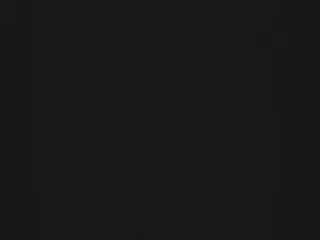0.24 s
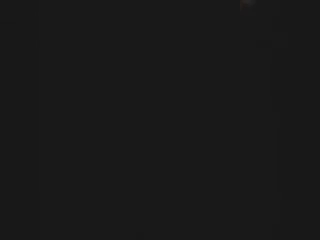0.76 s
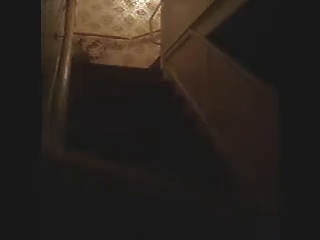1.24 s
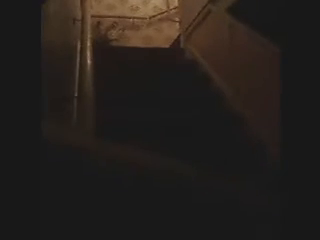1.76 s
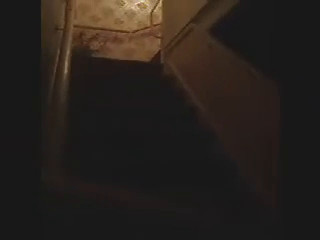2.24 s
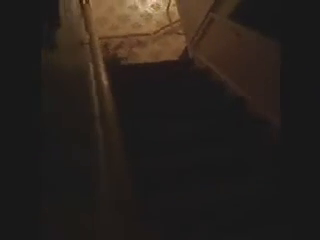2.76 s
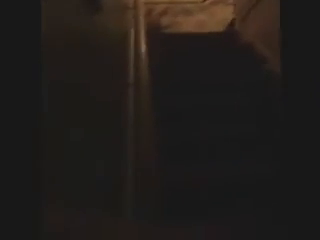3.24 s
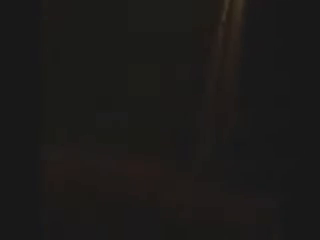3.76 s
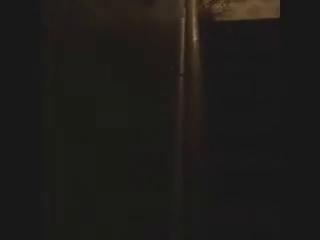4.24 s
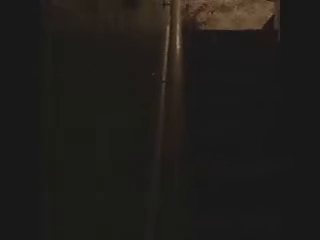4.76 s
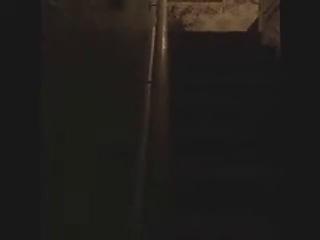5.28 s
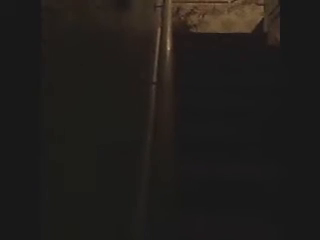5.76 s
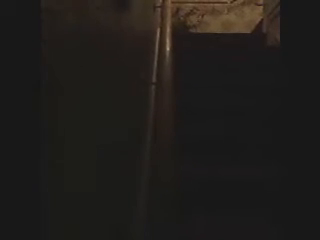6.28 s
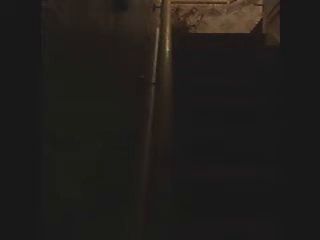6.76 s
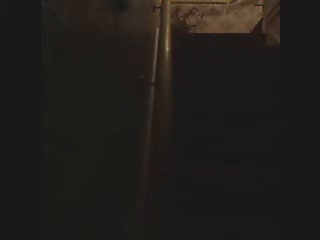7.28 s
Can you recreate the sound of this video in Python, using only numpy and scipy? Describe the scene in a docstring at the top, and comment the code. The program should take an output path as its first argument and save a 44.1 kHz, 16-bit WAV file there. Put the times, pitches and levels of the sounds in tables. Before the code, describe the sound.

A phone is shifted about in the hand on a dark indoor staircase. It opens with a tick and a loud bump, then skin and sleeve slide over the case right beside the microphone in short, hollow rustles. A sharp tick follows, and the rubbing, scuffing and bumping grow busier. The hand then settles, leaving hiss, a low house rumble, a hum and a few faint taps. The sound is dull and telephone-like.

```python
"""A phone is shifted about in the hand at night, over hiss and the low rumble and hum of a house.
It opens with a tick and a loud bump. Skin and sleeve then slide over the case beside the microphone:
their tiny slips rustle and make the case ring. A sharp tick comes at 1.6 s, and from 2.5 to 4 s fingers
rub, scuff and bump the most. After 5.4 s the hand settles, leaving the background and a few faint taps.
All along, the recorder cuts off the treble and its crude resampling adds a faint fizz."""
import sys
import numpy as np
from scipy import signal
from scipy.fft import rfft, irfft, next_fast_len
from scipy.io import wavfile
from scipy.ndimage import uniform_filter1d, map_coordinates

SR = 44100
rng = np.random.default_rng(int(sys.argv[2]) if len(sys.argv) > 2 else 0)


def put_to_file(sound):
    """Save the sound as 16-bit audio at rate SR, in the file named by the first command-line argument."""
    columns = np.atleast_2d(sound).T  # one column per channel
    safe = np.clip(columns, -1, 1)
    whole_steps = np.round(safe * 32767)
    wavfile.write(sys.argv[1], SR, whole_steps.astype(np.int16))


N = 331587
T = np.arange(N) / SR

# spectrum of the sharp, bright edge of rubbing and scuffing: pitch_hz, level_db
EDGE_SPECTRUM = [(500, -34), (1600, -4), (2500, -4.5), (2900, 5), (3150, 3), (3700, 6), (4000, -7.5)]


def undb(db):
    """Turn decibels into a gain to multiply by."""
    return 10 ** (np.asarray(db) / 20)


def unit(x):
    """Scale a signal to an average strength (rms) of 1."""
    return x / np.sqrt(np.mean(x ** 2))


def curves(table):
    """Join the rows of a table with straight lines in time, one curve per value column."""
    times, *columns = np.transpose(table)
    return [np.interp(T, times, column) for column in columns]


def colour(x, spectrum):
    """Shape the lows and highs of x by rows of pitch_hz, level_db; the result has strength 1."""
    hz, db = np.transpose(spectrum)
    size = next_fast_len(N)
    bin_hz = np.maximum(np.fft.rfftfreq(size, 1 / SR), 1)
    gain = undb(np.interp(np.log(bin_hz), np.log(hz), db))
    return unit(irfft(rfft(x, size) * gain, size)[:N])


def wander(rate_hz):
    """A random curve of strength 1 that takes a new direction rate_hz times a second."""
    step = max(int(SR / rate_hz), 2)
    return unit(uniform_filter1d(rng.standard_normal(N)[np.arange(N) // step], step))


def background():
    """Smooth hiss, the restless low rumble of the house and an appliance's wavering hum."""
    # background loudness over time: time_s, hiss_db, rumble_db, hum_db
    levels = [(0, -48, -70, -70), (1.2, -45, -53, -62), (3.2, -43.5, -55, -74), (4.7, -47.5, -50.5, -56.5),
              (5.9, -43, -49, -52), (7.5, -42, -47.5, -50.5)]
    # spectrum of the hiss: pitch_hz, level_db
    hiss_spectrum = [(30, -31), (300, -8.5), (520, -2), (760, 2.5), (1100, 3), (1500, 2), (2100, 4),
                     (3000, 2), (4000, -1)]
    # spectrum of the rumble: pitch_hz, level_db
    rumble_spectrum = [(20, -8), (50, -11.5), (95, -10), (140, -3), (230, -10), (310, -8.5), (375, -7.5),
                       (440, -10), (540, -11), (750, -20), (1500, -30)]
    # tones of the hum: pitch_hz, relative_db
    hum_tones = [(71.3, 0), (261.3, -7)]
    hiss_db, rumble_db, hum_db = curves(levels)
    hiss = colour(rng.standard_normal(N), hiss_spectrum) * undb(hiss_db)
    rumble = colour(rng.standard_normal(N), rumble_spectrum) * undb(rumble_db + 1.2 * wander(10))
    hum = 0
    for hz, db in hum_tones:
        cycles = np.cumsum(hz + .5 * wander(2.04)) / SR
        hum += undb(db) * np.sin(2 * np.pi * cycles)
    return hiss + rumble + np.sqrt(2) * hum * undb(hum_db + .5 * wander(7.2))


def hand_strokes():
    """Each stroke speeds up, slides and slows. Returns gains for the friction, its edge and the ring."""
    # strokes of the hand over the case (edge and ring are relative to the friction):
    # start_s, end_s, end_level_db, swell_db, edge_db, ring_db
    strokes = [(0.0, 0.076, -38.5, 0, -7.5, 1.5), (0.567, 0.608, -45.5, 3, -12, -4),
               (0.805, 0.866, -46.5, -4, -10, -0.5), (0.897, 0.947, -58.5, 0, -5, 10),
               (1.194, 1.353, -43.5, 14, -19, 1), (1.425, 1.424, -38.5, -2.5, -5.5, 1),
               (1.5, 1.61, -37.5, 3, -7.5, 4), (1.644, 1.774, -32, 1.5, -11.5, 0),
               (1.84, 1.883, -39.5, -4.5, -9, 3), (1.955, 2.041, -30.5, 1.5, -7.5, -1),
               (2.16, 2.42, -46, -4.5, -10, 4), (2.473, 2.533, -35.5, 1.5, -7, 5.5),
               (2.612, 2.739, -25, -1.5, -7, -3), (2.79, 2.913, -23, 3, -7.5, 0),
               (2.982, 3.056, -33, -0.5, -1.5, 1), (3.114, 3.155, -39, 7.5, -19, 1.5),
               (3.231, 3.46, -37, 6, -17.5, 3), (3.488, 3.598, -30.5, 6, -11.5, 1),
               (3.623, 3.684, -25, 3, -8.5, -15), (3.703, 3.727, -37, -2, -5, 10.5),
               (3.848, 3.873, -24, -2.5, -11.5, -6.5), (3.922, 3.941, -17.5, 2.5, 1, -6),
               (4.072, 4.136, -35, -1, -2.5, -1.5), (4.184, 4.275, -35.5, 0.5, -7.5, -3),
               (4.31, 4.434, -36, -1, -6, 1), (4.503, 4.615, -38, -1, -6.5, -2.5),
               (4.69, 4.8, -44.5, 0.5, -6.5, 2), (4.847, 4.917, -56.5, -1.5, -1, 11),
               (5.259, 5.413, -32.5, 6.5, -10, 1.5), (5.482, 5.5, -41.5, -3.5, -5.5, 1),
               (5.609, 5.77, -43.5, -1, -8.5, 2.5), (5.98, 6.05, -66, -2.5, -7, 13.5)]
    attack_s, release_s = 0.035, 0.037
    t = T[::100]  # coarse time steps are enough for loudness
    # the grip creeps between strokes, then comes to rest
    creep_db, creep_edge_db, creep_ring_db = -54, -9, 1.5
    still_s, settle_s = 5.4, .12
    creep = undb(creep_db) * np.exp(-np.maximum(t - still_s, 0) / settle_s)
    power = np.outer(undb([0, creep_edge_db, creep_ring_db]), creep) ** 2
    for start, end, db, swell_db, edge_db, ring_db in strokes:
        pressure = np.interp(t, [start, end], [undb(-swell_db), 1])
        fade = np.maximum(start - t, 0) / attack_s + np.maximum(t - end, 0) / release_s
        stroke = undb(db) * pressure * np.exp(-fade)
        power += np.outer(undb([0, edge_db, ring_db]), stroke) ** 2
    return [np.interp(T, t, gain) for gain in np.sqrt(power)]


def grains(per_second, scatter_db, catch_db):
    """Tiny slips of uneven size, in clusters as the skin catches and lets go."""
    slips = (rng.random(N) < per_second / SR) * np.sign(rng.standard_normal(N))
    return unit(slips * undb(scatter_db * rng.standard_normal(N) + catch_db * wander(130)))


def case_ring(push):
    """The case answers a push by ringing at its own pitches."""
    # resonances of the case: pitch_hz, width_hz, level_db
    resonances = [(228, 31, -10.5), (379.5, 60, 3.5), (482.5, 31, -3.5), (950, 105, -22), (1247, 19, -7)]
    return sum(undb(db) * signal.lfilter(*signal.iirpeak(hz, hz / width_hz, fs=SR), push)
               for hz, width_hz, db in resonances)


def rubbing():
    """Skin and sleeve rustle by the microphone and make the case ring, while the grip rocks the phone."""
    # spectrum of the friction: pitch_hz, level_db
    friction_spectrum = [(60, -26.5), (250, -6), (520, -4), (700, -1), (830, -1.5), (1000, 6), (1280, 3),
                         (1450, -1), (1750, 1.5), (2400, -4.5), (3000, -15.5), (4000, -28)]
    # spectrum of the phone rocking in the grip: pitch_hz, level_db
    rock_spectrum = [(20, -3), (60, -3.5), (160, -2), (290, -2), (500, -19.5), (2000, -80)]
    # rocking as the phone is turned, relative to the ring: time_s, level_db
    rock_levels = [(0, -2.5), (1.6, -11), (2.7, -9.5), (2.9, -2), (3.4, -5.5), (5.4, -6)]
    slide_gain, edge_gain, ring_gain = hand_strokes()
    slide = colour(grains(per_second=7000, scatter_db=3, catch_db=1), friction_spectrum)
    edge = colour(grains(per_second=7000, scatter_db=6, catch_db=-2), EDGE_SPECTRUM)
    push_spectrum = [(50, -23), (250, 2), (1200, 4), (4000, -5)]  # pitch_hz, level_db
    push = colour(grains(per_second=4000, scatter_db=2.5, catch_db=1.5), push_spectrum)
    ring = unit(case_ring(push))
    rock = undb(curves(rock_levels)[0]) * colour(rng.standard_normal(N), rock_spectrum)
    return slide_gain * slide + edge_gain * edge + ring_gain * (ring + rock)


def tick():
    """A hard touch chatters for an instant, so each tone of the case starts a little apart; peak 1."""
    # tones of a tick: pitch_hz, decay_s (time to fall 60 dB), level_db
    tones = [(366, 0.12, -43), (580, 0.025, 6), (1173, 0.03, 4.5), (1497, 0.01, 13), (1800, 0.0078, 14.5),
             (2540, 0.01, 3), (3230, 0.014, -2), (3840, 0.031, -13.5)]
    low_cut_hz = 377  # the small case gives off little sound below this
    ring = 0
    for hz, decay_s, db in tones:
        detune, late = rng.random(2)
        t = np.maximum(T[:SR // 5] - .001 * late, 0)
        pitch_hz = hz * (1 + 0.019 * (detune - .5))
        ring += undb(db - 60 * t / decay_s) * np.sin(2 * np.pi * pitch_hz * t)
    ring = signal.sosfilt(signal.butter(2, low_cut_hz, "high", fs=SR, output="sos"), ring)
    return ring / np.abs(ring).max()


def add(out, start_s, sound):
    """Mix a short sound into out at start_s."""
    i = max(int(start_s * SR), 0)
    out[i:i + len(sound)] += sound[:N - i]


def ticks():
    """A fingernail taps or the case gives a little, and the case rings briefly."""
    # hard ticks: start_s, peak_db
    taps = [(0.024, -24), (0.138, -24), (0.1859, -16.5), (1.583, -4.5), (1.7452, -21.5), (2.393, -25),
            (3.137, -28), (3.968, -4), (5.624, -34), (6.009, -44), (7.236, -31.5)]
    out = np.zeros(N)
    for start, db in taps:
        add(out, start, undb(db) * tick())
    return out


def swing(hz, cycles):
    """A swing of air pressure that fades to about a third in the given number of cycles; peak 1."""
    elapsed_cycles = hz * T[:SR // 5]
    wave = np.sin(2 * np.pi * elapsed_cycles) * np.exp(-elapsed_cycles / cycles)
    return wave / np.abs(wave).max()


def bumps():
    """A finger bumps the case: it pushes air into the microphone hole, sways the phone and clicks."""
    # soft bumps (sway and click are relative to the level): start_s, level_db, pitch_hz, sway_db, click_db
    knocks = [(0.0649, 2.5, 392, -9, -11.5), (2.503, -29, 60, -14, -18), (2.8535, -8.5, 148, 0, -4),
              (2.8839, -7, 365, -26, -19), (2.9112, -1, 261, -3, -7), (2.932, -8.5, 290, -22, -14),
              (3.0446, -10, 290, -6, 1.5), (3.643, -14.5, 58.4, -2, -25), (3.715, -15, 344, -32, -31),
              (3.744, -17, 261, -20, -25), (3.772, -16, 230, -22, -22), (3.7913, -15, 230, -29, -25),
              (5.371, -14.5, 223, -10, -33), (7.027, -31, 170, -14, -25)]
    out = np.zeros(N)
    for start, db, hz, sway_db, click_db in knocks:
        add(out, start, undb(db) * swing(hz, cycles=0.39))
        add(out, start + 0.00022, -undb(db + sway_db) * swing(hz=93, cycles=0.32))
        click = undb(-1) * tick() - undb(4.5) * swing(hz=2540, cycles=0.093)
        add(out, start, undb(db + click_db) * click)
    return out


def scuffs():
    """A finger slips: coarse, hollow friction holds or swells, then stops short."""
    # quick slips of a finger: start_s, end_s, end_level_db, swell_db, relative_edge_db
    slips = [(0.115, 0.171, -23.5, 10.5, -26), (2.495, 2.515, -26.5, 0, -0.5), (2.552, 2.58, -28.5, 0, -9),
             (3.0474, 3.059, -14.5, 0, -14), (3.958, 3.965, -13, 16, -5)]
    # spectrum of a slip: pitch_hz, level_db
    slip_spectrum = [(60, -11), (330, -3), (530, 3.5), (800, -5.5), (1500, -2), (2200, -8), (3000, -19.5),
                     (4000, -26)]
    body = colour(grains(per_second=3000, scatter_db=3, catch_db=1), slip_spectrum)
    edge = colour(grains(per_second=3000, scatter_db=3, catch_db=1), EDGE_SPECTRUM)
    out = np.zeros(N)
    for start, end, db, swell_db, edge_db in slips:
        gain = np.interp(T, [start - .001, start, end, end + 0.0078], [0, undb(db - swell_db), undb(db), 0])
        out += gain * (body + undb(edge_db) * edge)
    return out


def scene():
    """Everything reaches the one microphone directly."""
    return (rubbing() + scuffs() + bumps() + ticks() + background())[None]


def record(dry):
    """The recorder clips loud peaks, keeps a telephone-like band and adds a faint fizz above it."""
    low_cut_hz, band_hz, clock_hz, top_hz = 40, 3900, 32000, 12900
    clip_level, offset = .87, -.004  # the offset shifts the whole wave slightly off zero
    low_cut = signal.butter(1, low_cut_hz, "high", fs=SR, output="sos")
    band_limit = signal.ellip(10, .2, 75, band_hz, fs=SR, output="sos")
    top_cut = signal.ellip(12, .2, 100, top_hz, fs=SR, output="sos")
    clipped = np.clip(signal.sosfilt(low_cut, dry[0]), -clip_level, clip_level)
    narrow = signal.sosfilt(band_limit, clipped)
    # crude resampling: each sample holds the value at the last step of a slower clock, which fizzes
    last_step_s = np.floor(T * clock_hz) / clock_hz
    held = map_coordinates(narrow, [last_step_s * SR], order=3)
    return signal.sosfilt(top_cut, held)[None] + offset


dry = scene()
out = record(dry)
put_to_file(out)
```